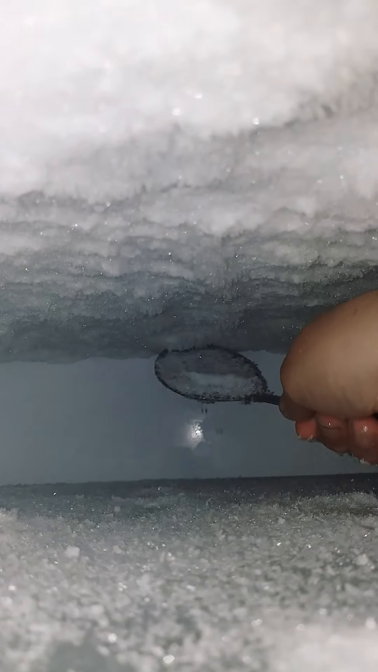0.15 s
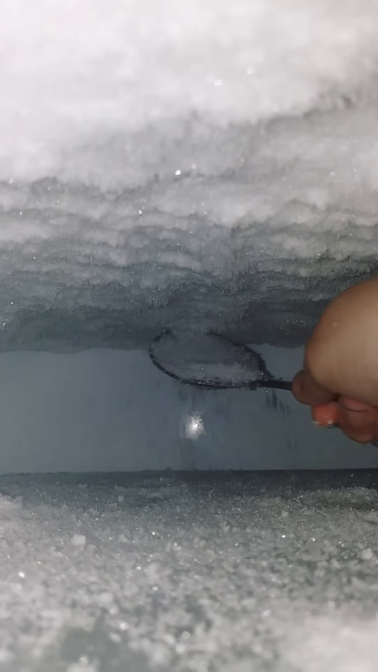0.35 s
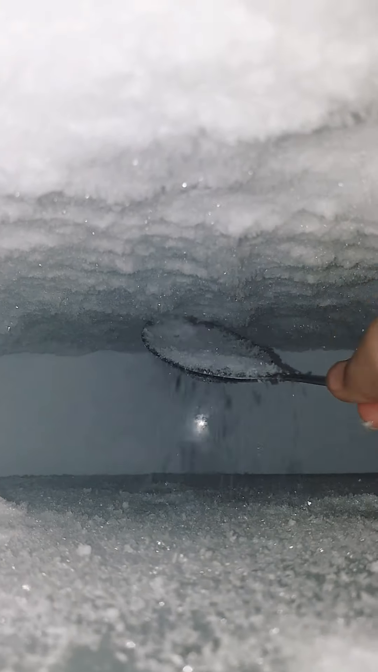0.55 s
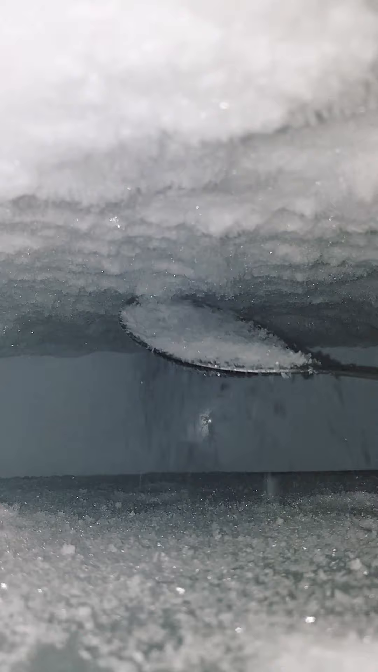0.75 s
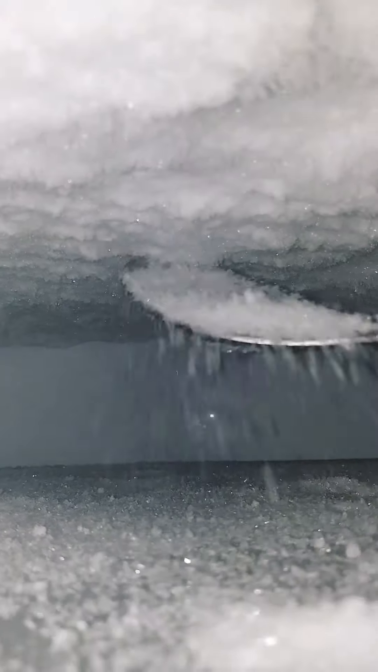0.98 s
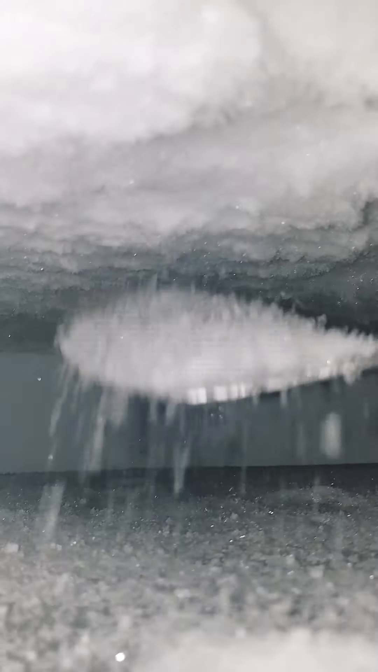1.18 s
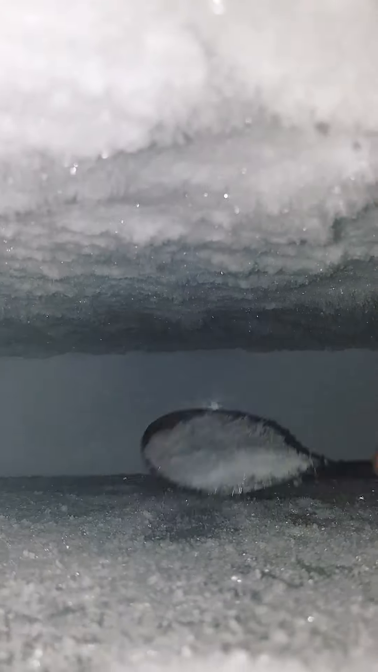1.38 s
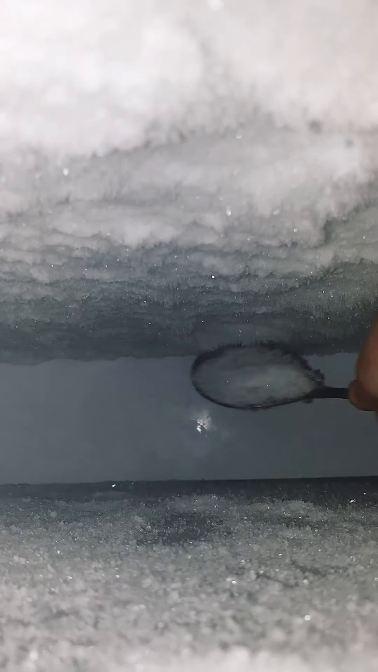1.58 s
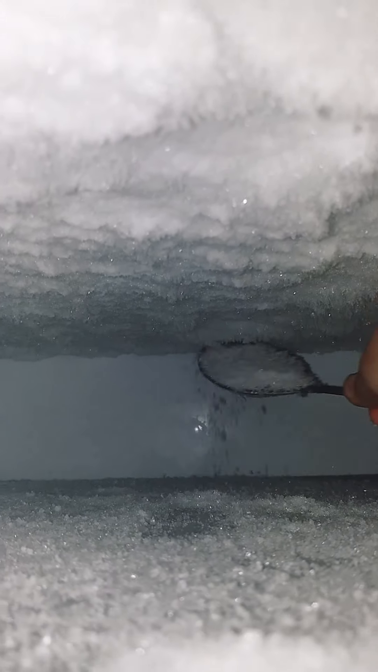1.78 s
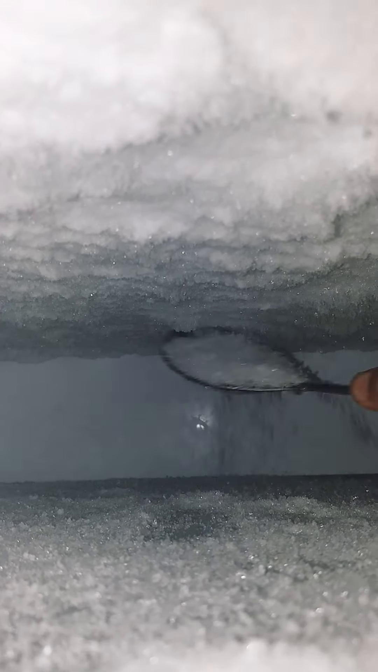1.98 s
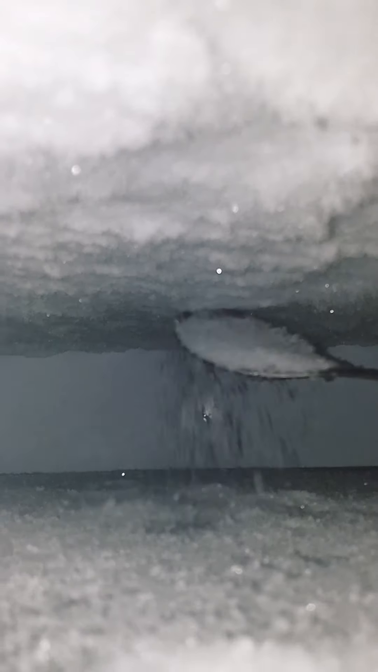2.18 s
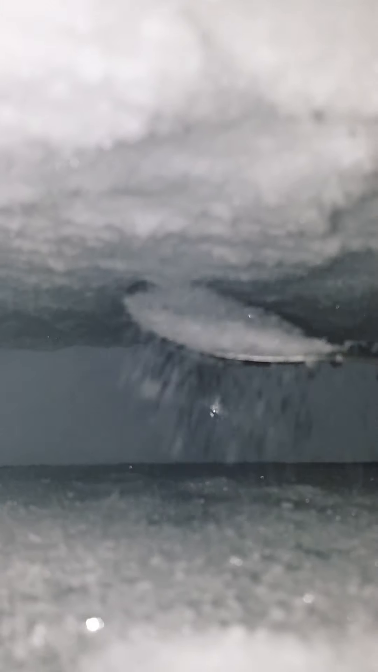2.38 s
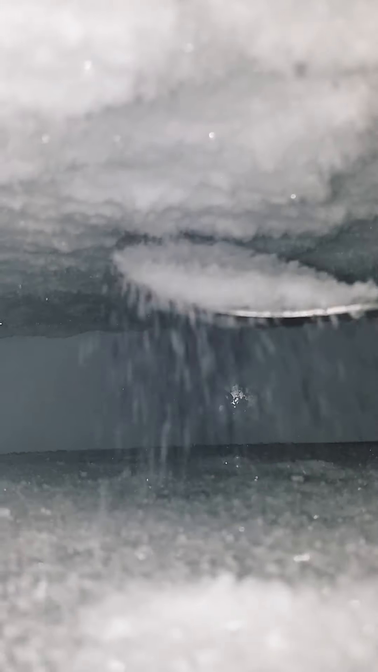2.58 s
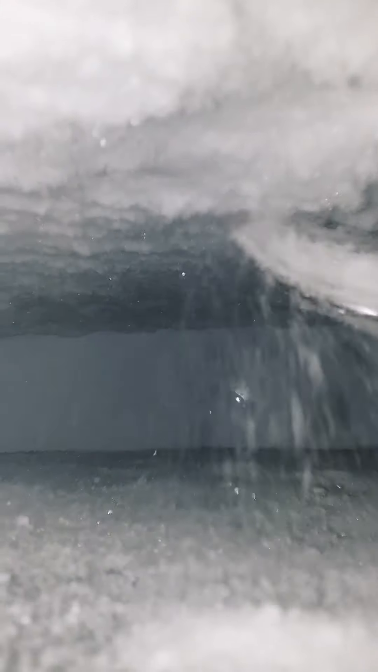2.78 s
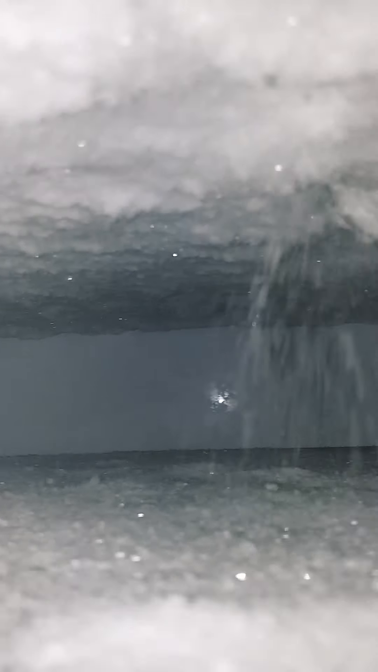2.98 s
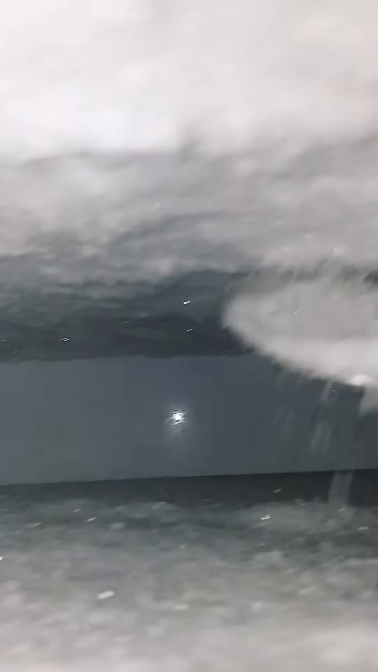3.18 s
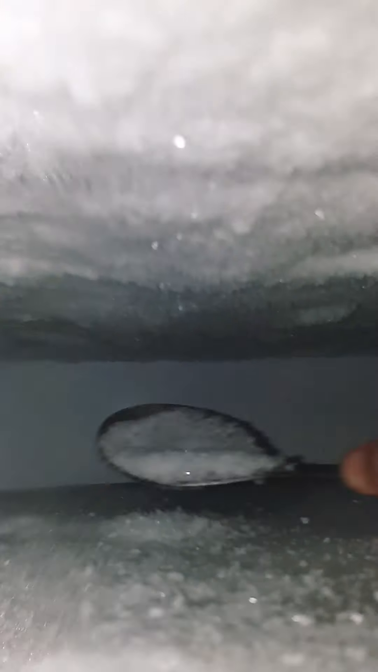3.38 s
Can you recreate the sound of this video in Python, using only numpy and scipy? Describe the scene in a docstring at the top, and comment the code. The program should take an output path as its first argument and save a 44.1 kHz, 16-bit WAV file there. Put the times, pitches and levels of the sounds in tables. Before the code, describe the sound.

A steel spoon scrapes frost in a freezer: a bite and long crunchy rasp, a hard knock on the floor, then a second longer scrape and softer knocks. Close microphone, boxy compartment, quiet room noise.

```python
"""Inside a freezer, a steel spoon is set against the frosted roof and pulled forward in two long strokes.
Random tiny cracks make a dense crunch that drives the liner, the roof panel and the spoon.
The wall echoes shift as the spoon travels; larger pieces of crust snap, and the edge bites with a thump.
The spoon knocks on the floor after each stroke, single crumbs tick and fine powder patters down.
Quiet room noise lies beneath, with a low rustle at the beginning and end."""
import sys
import numpy as np
from scipy import signal
from scipy.fft import rfft, irfft, next_fast_len
from scipy.io import wavfile
from scipy.ndimage import uniform_filter1d, map_coordinates

SR = 44100
rng = np.random.default_rng(int(sys.argv[2]) if len(sys.argv) > 2 else 0)


def output_pcm(signal):
    """Save a mono or channel-first signal as 16-bit PCM at the path in sys.argv[1].

    Samples are clipped to [-1, 1] before scaling.
    """
    pcm = np.clip(np.atleast_2d(signal).T, -1, 1) * 32767
    wavfile.write(sys.argv[1], SR, np.round(pcm).astype(np.int16))


N = 149940

# How far the spoon has been pulled. Each row: time in seconds, place from 0 (back) to 1 (front).
TRAVEL = [(.25, .1), (.7, .5), (1.05, .8), (1.3, .55), (1.8, .05), (2.3, .5), (2.85, 1), (3.05, 1),
          (3.25, .6)]
# Tone of small bits of ice. Each row: frequency in Hz, relative level in dB per Hz.
TICK = [(300, -55), (1600, 6.5), (4500, -3), (9500, -11), (16000, -15)]
CONTACT_RISE_S = 0.0017  # swell of a knock or a crumb


def amp(db):
    """Turn decibels into a gain."""
    return 10 ** (np.asarray(db) / 20)


def unit(x):
    """Scale a sound to an rms strength of 1."""
    return x / np.sqrt(np.mean(x ** 2) + 1e-20)


def clock():
    """Give the time of each sample in seconds."""
    return np.arange(N) / SR


def curves(rows):
    """Draw straight lines between rows: one curve for each column after the time."""
    s, *cols = np.transpose(rows)
    return [np.interp(clock(), s, c) for c in cols]


def wobble(rate):
    """Make a smooth random curve through rate random points a second."""
    return map_coordinates(rng.standard_normal(4096), [clock() * rate], mode="wrap")


def decay(t, t60):
    """Die away by 60 dB in t60 seconds."""
    return np.exp(-np.log(1000) * t / t60)


def burst(start, rise, fall):
    """Swell up to the start time, then die away; rise and fall are time constants in seconds."""
    t = clock() - start
    return np.exp(np.minimum(t / rise, -t / fall))


def colour(x, points):
    """Shape the tone through (Hz, dB) points with a filter of unit energy that never acts early."""
    size = 8192
    hz, db = np.transpose(points)
    gain = amp(np.interp(np.log(np.fft.rfftfreq(size, 1 / SR) + 1), np.log(hz), db))
    # folding the cepstrum makes the filter minimum-phase
    cepstrum = irfft(np.log(gain))
    cepstrum[1:size // 2] *= 2
    cepstrum[size // 2 + 1:] = 0
    response = irfft(np.exp(rfft(cepstrum)))
    return signal.fftconvolve(x, response / np.linalg.norm(response))[:N]


def resonate(x, modes):
    """Drive a set of (Hz, width in Hz, dB) resonances with alternating sign."""
    m = next_fast_len(N + SR // 2)
    f = np.fft.rfftfreq(m, 1 / SR)
    body = 0
    for k, (centre, width, db) in enumerate(modes):
        spread = 1j * f * width
        body = body + (-1) ** k * amp(db) * spread / (centre * centre - f * f + spread)
    return irfft(rfft(x, m) * body, m)[:N]


def steady(x):
    """Hold a sound at an even strength over a tenth of a second."""
    half = SR // 10 // 2
    power = uniform_filter1d(uniform_filter1d(x * x, half), half)
    return x / np.sqrt(np.abs(power) + 1e-9)


def fractures(rate, spread_db):
    """Tiny cracks of unequal size at random moments, rate of them a second."""
    happens = rng.random(N) < rate / SR
    size_db = spread_db * np.clip(rng.standard_normal(N), -2, 2)
    return unit(happens * rng.choice([-1, 1], N) * amp(size_db))


def box(x, count=7):
    """Wall echoes slide with the spoon, and the compartment's short tail changes from place to place."""
    # Echoes. Each row: delay at the back in ms, delay at the front in ms, gain against the direct sound.
    walls = [(0.54, 1.487, 0.17), (2.715, 1.279, 0.79), (2.318, 4.5, 1), (6.6, 3.1, 0.23),
             (6.1, 8.6, 0.087)]
    tail_t60, tail_db = 0.048, 5.5  # seconds, dB
    travel, = curves(TRAVEL)
    echoes = 0
    for back, front, gain in walls:
        delay_ms = back + (front - back) * travel
        echoes = echoes + gain * map_coordinates(x, [np.arange(N) - delay_ms * SR / 1000], order=3)
    t = np.arange(SR // 8) / SR
    tails = rng.standard_normal((count, len(t))) * decay(t, tail_t60)
    place = np.clip(travel, 0, 1) * (count - 1)
    wet = 0
    for k, tail in enumerate(tails):
        nearness = np.sqrt(np.clip(1 - abs(place - k), 0, 1))
        wet = wet + nearness * signal.oaconvolve(x, tail / np.linalg.norm(tail))[:N]
    return unit(x + echoes + amp(tail_db) * wet)


def background():
    """Steady room noise, and shaped noise that rustles low in the box mainly at beginning and end."""
    # Strength of the rustle. Each row: time in seconds, level in dB.
    rustle_levels = [(0, -35.5), (.04, -41), (.09, -47), (.12, -50), (.2, -83), (3.1, -54), (3.19, -39),
                     (3.27, -37.5), (3.31, -47), (3.4, -48.5)]
    # Tone of the rustle. Each row: frequency in Hz, relative level in dB per Hz.
    rustle_tone = [(60, -44), (110, 6), (200, -13), (290, 2), (430, -10.5), (600, -14), (1500, -22),
                   (4000, -28.5), (12000, -41)]
    # Tone of the room. Each row: frequency in Hz, relative level in dB per Hz.
    room_tone = [(15, -42), (25, 1), (137, -6.5), (695, -15), (2110, -18.5), (5000, -20), (7310, -33),
                 (9500, -25), (11500, -45), (16000, -37)]
    room_db = -54
    rustle_db, = curves(rustle_levels)
    room = amp(room_db) * colour(rng.standard_normal(N), room_tone)
    return room + amp(rustle_db) * colour(rng.standard_normal(N), rustle_tone)


def powder():
    """Loosened frost patters on the floor after each stroke: many tiny impacts that fade away."""
    # Falls of powder. Each row: time of the peak in seconds, level in dB.
    falls = [(1.24, -49.5), (3.14, -50.5)]
    grains_per_s, spread_db, rise_s, fall_s = 400, 6, .04, .3
    patter = box(colour(fractures(grains_per_s, spread_db), TICK))
    return patter * sum(amp(db) * burst(s, rise_s, fall_s) for s, db in falls)


def crumbs():
    """Single bits of ice snap off or land, each a very short burst of noise."""
    # Ticks. Each row: time of the peak in seconds, level in dB.
    ticks = [(.1012, -46.5), (.177, -57), (0.267, -35), (3.171, -32), (3.188, -46), (3.377, -49)]
    fall_s = 0.0023
    noise = colour(rng.standard_normal(N), TICK)
    return noise * sum(amp(db) * burst(s, CONTACT_RISE_S, fall_s) for s, db in ticks)


def knocks():
    """The spoon hits the floor: a clack of noise, then decaying floor tones and a hollow after-sound."""
    # Hits. Each row: time in seconds, clack level in dB, ring level in dB, clack's treble limit in Hz.
    hits = [(1.3753, -17, -26.5, 14000), (1.401, -34, -61, 6000), (3.229, -25, -52, 3030),
            (3.243, -27, -41, 3000)]
    # Tones of the floor. Each row: frequency in Hz, level within the ring in dB, 60 dB decay in seconds.
    floor_modes = [(47, -14, 0.72), (109.3, -8, 0.53), (193, 3, 0.057), (259.5, -5, 0.48), (340, -26, 1),
                   (474, -4.5, 0.55), (530, 1, 0.25), (610, -3, 0.17), (977, -11, 0.33), (1455, 3.5, 0.17),
                   (1583, -10, 0.23), (2500, -4, 0.087)]
    # Tone of the clack. Each row: frequency in Hz, relative level in dB per Hz.
    clack_tone = [(40, -39), (100, 0), (500, -13), (1500, 3), (2800, 6), (3400, -7.5), (4400, -1.5),
                  (5000, -3.5), (6500, -9), (7300, -7), (8200, -15), (9600, -13), (16000, -31)]
    # Tone of the compartment's after-sound. Each row: frequency in Hz, relative level in dB per Hz.
    hollow_tone = [(60, -23), (250, 9), (700, -5), (2800, -15.5), (4000, -42)]
    fall_s, tail_db, tail_s = 0.0038, -16, 0.016  # the clack's fall and its weaker, longer tail
    hollow_db, hollow_fall_s = -4.5, 0.07  # level against the ring
    blur, blur_share = 0.65, 0.11  # phase unrest in radians, and its rate as a share of the pitch
    clack, out = colour(rng.standard_normal(N), clack_tone), np.zeros(N)
    hollow = colour(rng.standard_normal(N), hollow_tone)
    for s, clack_db, ring_db, bright_hz in hits:
        t = np.maximum(clock() - s, 0)
        padded = signal.sosfilt(signal.butter(3, bright_hz, fs=SR, output="sos"), clack)
        hit = burst(s, CONTACT_RISE_S, fall_s) + amp(tail_db) * burst(s, CONTACT_RISE_S, tail_s)
        out += amp(clack_db) * padded * hit
        ring = amp(hollow_db) * hollow * np.exp(-t / hollow_fall_s)
        for k, (hz, db, t60) in enumerate(floor_modes):
            phase = 2 * np.pi * hz * t + blur * wobble(hz * blur_share)
            ring += (-1) ** k * amp(db) * np.sin(phase) * decay(t, t60)
        out += amp(ring_db) * ring * (1 - np.exp(-t / CONTACT_RISE_S))
    return out


def snaps():
    """Larger pieces of crust break off under the edge, each a sharp burst of noise."""
    # Breaks. Each row: time of the peak in seconds, level in dB.
    breaks = [(0.316, -22), (0.651, -15), (.755, -17), (0.832, -14.5), (1.0, -15.5), (1.788, -28.5),
              (1.863, -17.5), (1.887, -18), (1.914, -19), (1.969, -18.5), (2.354, -17.5), (2.584, -16),
              (2.865, -21.5)]
    # Tone of a break. Each row: frequency in Hz, relative level in dB per Hz.
    break_tone = [(500, -12), (2000, 0.5), (3200, 4.5), (5000, -4.5), (8000, -15.5), (16000, -32)]
    rise_s, fall_s = .0012, .005
    noise = colour(rng.standard_normal(N), break_tone)
    return noise * sum(amp(db) * burst(s, rise_s, fall_s) for s, db in breaks)


def bites():
    """The edge catches: noise for crushed crust, tones for the bowl's ping, then a dull roof thump."""
    # Catches. Each row: time in seconds, crunch level in dB, thump level in dB, thump's hold in seconds.
    catches = [(0.204, -19.5, -14, 0.0094), (1.646, -19.5, -10, 0.014), (1.702, -27, -23, .004),
               (1.819, -22, -14.5, 0.014)]
    # Tones of the roof's thump. Each row: frequency in Hz, relative level in dB.
    thump_modes = [(135, -10), (283, 1), (385, -11.5), (560, -11.5), (690, -17)]
    # Tones of the bowl's ping. Each row: frequency in Hz, relative level in dB.
    ping_modes = [(1800, -3), (2070, 0.5), (2220, -3.5)]
    # Tone of the crushed crust. Each row: frequency in Hz, relative level in dB per Hz.
    crush_tone = [(100, -20), (700, -4), (1000, -5), (1300, -13), (2000, 1), (2800, -9), (4300, -9),
                  (7000, -20), (16000, -36)]
    rise_s, fall_s = .0018, 0.011
    lag_s, thump_rise_s, thump_t60 = 0.00284, 0.00098, 0.075
    ping_db, ping_t60 = 3, 0.064  # level against the crunch
    crunch, out = colour(rng.standard_normal(N), crush_tone), np.zeros(N)
    for s, crunch_db, thump_db, hold in catches:
        t = np.maximum(clock() - s - lag_s, 0)
        press = (1 - np.exp(-t / thump_rise_s)) * decay(np.maximum(t - hold, 0), thump_t60)
        thump = sum(amp(db) * np.sin(2 * np.pi * (hz * t + rng.random())) for hz, db in thump_modes)
        out += amp(thump_db) * press * thump
        ping = sum(amp(db) * np.sin(2 * np.pi * (hz * clock() + rng.random())) for hz, db in ping_modes)
        out += amp(crunch_db) * burst(s, rise_s, fall_s) * crunch
        out += amp(crunch_db + ping_db) * burst(s, rise_s, ping_t60 / np.log(1000)) * ping
    return out


def spoon_ring(x):
    """The bowl sings narrowly at the back; the frost it gathers on the way forward damps it."""
    # The pitch moves with the point of contact. Each row: time in seconds, level over the rasp's
    # echoing cracks in dB, pitch in Hz.
    ringing = [(.3, 3, 2080), (.47, -6, 2100), (.58, -2, 2160), (.78, -3, 2340), (1.05, -13, 2200),
               (1.86, -4, 1890), (2.12, -3.5, 2190), (2.45, -10, 2400)]
    empty_width_hz, loaded_width_hz = 60, 200
    ringing_db, hz = curves(ringing)
    travel, = curves(TRAVEL)
    turn = np.exp(2j * np.pi * np.cumsum(hz) / SR)

    def sing(width):
        # shift the moving pitch to zero, smooth there, and shift it back
        slow = signal.lfilter([1], [1, -np.exp(-np.pi * width / SR)], x / turn)
        return steady((turn * slow).real)

    return amp(ringing_db) * ((1 - travel) * sing(empty_width_hz) + travel * sing(loaded_width_hz))


def boom_layer(cracks):
    """The cracks drive the low resonances of the liner."""
    # Resonances. Each row: frequency in Hz, width in Hz, relative level in dB.
    liner = [(110.3, 33, -10), (121.4, 8.8, 1), (157.7, 13.1, -8.5)]
    # Tone. Each row: frequency in Hz, relative level in dB per Hz.
    tone = [(25, -64), (60, -13), (100, -11.5), (175, -1.5), (205, -4.5), (400, -74), (2000, -112)]
    return steady(colour(resonate(cracks, liner), tone))


def panel_layer(cracks, travel):
    """The cracks drive the roof panel, whose balance of tones changes from back to front."""
    # Resonances. Each row: frequency in Hz, width in Hz, relative level in dB scraped at the back,
    # relative level in dB at the front.
    modes = [(243, 30, -12, -10), (285, 19, 0.5, -4), (315, 20.8, -2.5, 1.5), (403.6, 9, 1, -5.5),
             (439.7, 11.3, -6, -2), (482.4, 20, -11.5, -7), (572.6, 45, -6, -6), (679.5, 22.7, -2, -6),
             (753.4, 12, -6, -2.5), (863, 59, -12.5, -6), (1030, 106, -13.5, -7.5)]
    # Tone. Each row: frequency in Hz, relative level in dB per Hz.
    tone = [(60, -70.5), (195, 14.5), (240, 5), (1050, -2), (1250, -8), (3000, -13.5), (10000, -70)]
    at_back = resonate(cracks, [(hz, width, db) for hz, width, db, _ in modes])
    at_front = resonate(cracks, [(hz, width, db) for hz, width, _, db in modes])
    forward = np.clip(travel, 0, 1) ** 2
    return steady(colour((1 - forward) * at_back + forward * at_front, tone))


def rasp_layer(cracks):
    """The cracks echo in the box, ring the spoon and excite the compartment's hollow resonances."""
    # Tone. Each row: frequency in Hz, relative level in dB per Hz.
    tone = [(300, -61), (850, -13), (1080, -4.5), (1240, -11), (1550, 1.5), (1830, 4), (2300, 0),
            (2700, -8), (3100, -3), (3600, -8), (4900, -12.5), (6000, -17), (12000, -74.5)]
    # Hollow resonances. Each row: frequency in Hz, width in Hz, relative level in dB.
    cavity_modes = [(1440, 260, -1), (1840, 240, -1)]
    # Strength of the hollow sound within the rasp. Each row: time in seconds, relative level in dB.
    hollowness = [(.5, -18), (1.1, -3.5), (1.3, 9), (1.8, -16), (2.35, -5), (2.8, 0.5)]
    hollow_db, = curves(hollowness)
    cavity = amp(hollow_db) * box(resonate(cracks, cavity_modes))
    return steady(box(colour(cracks, tone)) + spoon_ring(cracks) + cavity)


def fizz_layer(cracks, more_cracks, travel):
    """Fine crystals fizz in clumps, brighter towards the front, with extra crunch partway along."""
    # Tone of the fizz. Each row: frequency in Hz, relative level in dB per Hz.
    fizz_tone = [(800, -27), (2500, 2.5), (4200, 2), (5100, 3), (6000, -1), (7100, 3), (7800, -4),
                 (8700, -5.5), (9600, -2), (10600, -16.5), (13000, -4.5), (14000, -13), (15500, -6.5)]
    # Tone of the extra crunch. Each row: frequency in Hz, relative level in dB per Hz.
    crunch_tone = [(1500, -53), (3000, -3), (4200, 9.5), (5100, 3.5), (5900, -10), (7100, -11), (8000, 1.5),
                   (12000, -14.5)]
    crystals_per_s, crystal_spread_db = 4000, 15
    crisp_hz, crisp_db = 10000, 14  # treble above this pitch gains this much from back to front
    crunch_db, crunch_at, crunch_width = -1, 0.61, 0.2  # peak level, and its place along the travel
    clumps_per_s, clump_db = 85, 1.8
    crystals = fractures(crystals_per_s, crystal_spread_db)
    fizz = box(colour(crystals + 0.44 * cracks, fizz_tone))
    crisp = signal.sosfiltfilt(signal.butter(2, crisp_hz, "high", fs=SR, output="sos"), fizz)
    fizz = steady(fizz + crisp * (amp(crisp_db * (travel - 1.0)) - 1))
    deep = np.exp(-.5 * ((travel - crunch_at) / crunch_width) ** 2)
    fizz += amp(crunch_db) * deep * box(colour(more_cracks, crunch_tone))
    return fizz * amp(clump_db * wobble(clumps_per_s))


def scrape():
    """Breaking frost drives boom, panel rattle, rasp and fizz, whose levels follow the two strokes."""
    # The strokes. Each row: time in seconds, then levels in dB, before the layer trims below, of
    # liner boom, panel rattle, spoon rasp and crystal fizz.
    stroke_1 = [(0.235, -36, -30.5, -36.5, -70), (0.309, -35.5, -27, -25.5, -54),
                (0.375, -26, -19, -16, -29.5), (0.441, -17, -18, -20, -29), (0.471, -26, -14, -20, -29),
                (0.573, -24, -14.5, -17, -30.5), (0.717, -14.5, -17, -18, -32.5),
                (0.773, -20.5, -15.5, -17.5, -30.5), (0.919, -14.5, -19, -22, -31.5),
                (0.991, -20.5, -14.5, -18.5, -31.5), (1.023, -11, -15, -21.5, -33),
                (1.085, -18.5, -20, -22, -31), (1.199, -21.5, -21.5, -25.5, -37),
                (1.235, -28, -33, -37.5, -64), (1.36, -51, -42.5, -49, -78)]
    stroke_2 = [(1.678, -20, -20.5, -28.5, -46), (1.7, -35, -25.5, -27.5, -49),
                (1.76, -38, -29.5, -39.5, -60), (1.784, -46, -32, -38, -51), (1.809, -31, -25, -31, -38),
                (1.825, -30.5, -22.5, -22.5, -39), (1.92, -22, -17.5, -17, -32.5),
                (2.044, -27, -15, -19.5, -30), (2.076, -13, -15.5, -17.5, -33.5),
                (2.098, -13, -14.5, -22, -31.5), (2.124, -30, -17.5, -14.5, -28),
                (2.154, -21.5, -16.5, -21.5, -32), (2.326, -17, -14.5, -19, -29),
                (2.424, -21.5, -17.5, -21, -30), (2.64, -16, -18.5, -21, -28),
                (2.666, -20.5, -19.5, -25, -30), (2.806, -14, -18.5, -21, -27.5),
                (2.928, -20, -20, -26, -33), (2.954, -15, -20.5, -26.5, -29.5),
                (3.073, -19.5, -23, -26.5, -33), (3.132, -27, -25.5, -39, -52), (3.166, -45, -35, -42, -66),
                (3.2, -40, -34, -44, -68)]
    boom_db, panel_db, rasp_db, fizz_db = -0.5, -0.5, 0.5, -2  # layer trims
    cracks_per_s, crack_spread_db, fade_s = 1700, 3, 0.043
    travel, = curves(TRAVEL)
    cracks = fractures(cracks_per_s, crack_spread_db)
    more_cracks = fractures(cracks_per_s, crack_spread_db)
    layers = [amp(boom_db) * boom_layer(cracks),
              amp(panel_db) * panel_layer(cracks, travel),
              amp(rasp_db) * rasp_layer(cracks),
              amp(fizz_db) * fizz_layer(cracks, more_cracks, travel)]
    out, t = np.zeros(N), clock()
    for stroke in (stroke_1, stroke_2):
        # fade in before the first row and out after the last
        touching = np.clip(1 + np.minimum(t - stroke[0][0], stroke[-1][0] - t) / fade_s, 0, 1)
        out += touching * sum(amp(db) * layer for db, layer in zip(curves(stroke), layers))
    return out


def scene():
    """Add up everything heard at the freezer's mouth, as one channel."""
    return (background() + powder() + crumbs() + knocks() + snaps() + bites() + scrape())[None]


def record(dry):
    """Round off the peaks and remove everything above the band limit."""
    top_hz = 15900
    rounded = dry / (1 + np.abs(dry / .95) ** 6) ** (1 / 6)
    m = next_fast_len(N + SR // 2)
    kept = np.fft.rfftfreq(m, 1 / SR) < top_hz
    return irfft(rfft(rounded, m) * kept, m)[..., :N]


dry = scene()
out = record(dry)
output_pcm(out)
```